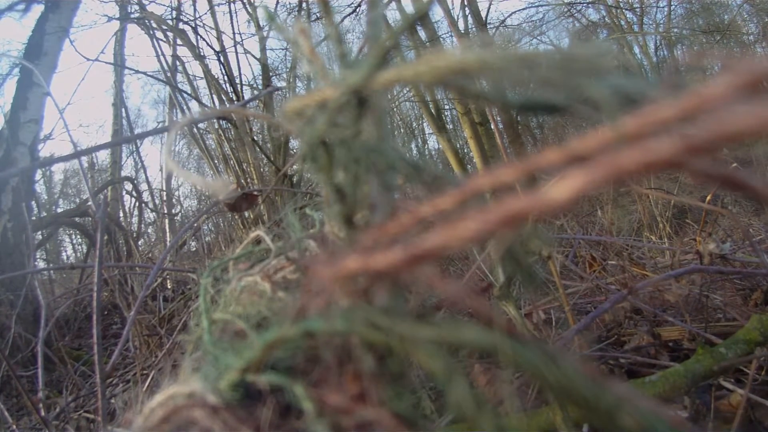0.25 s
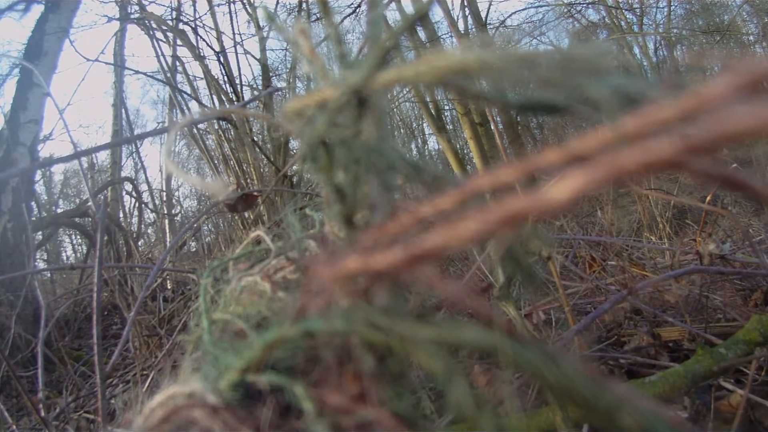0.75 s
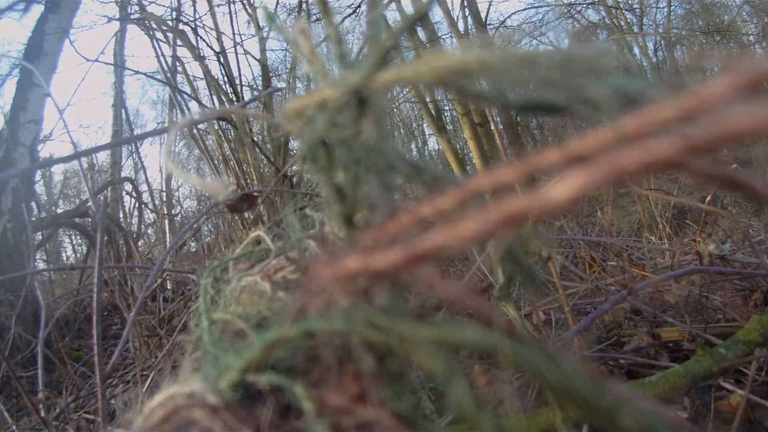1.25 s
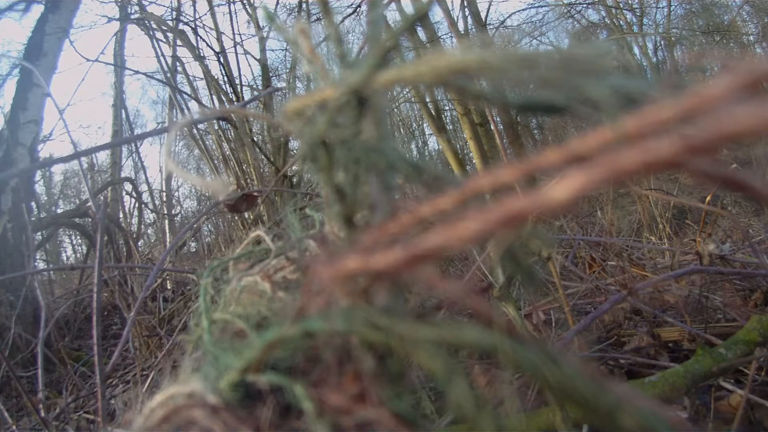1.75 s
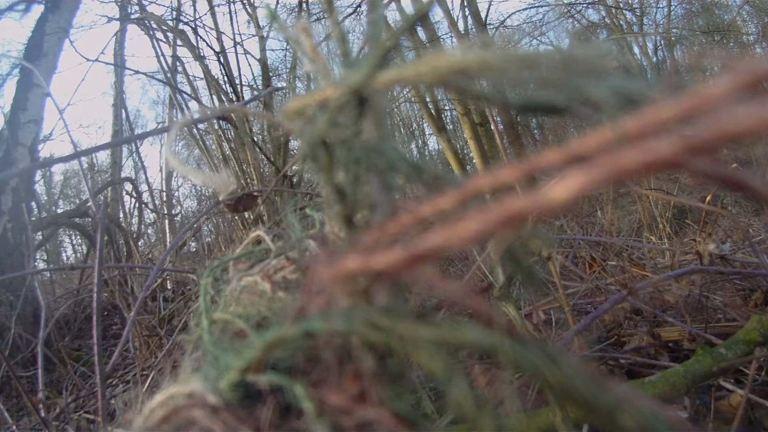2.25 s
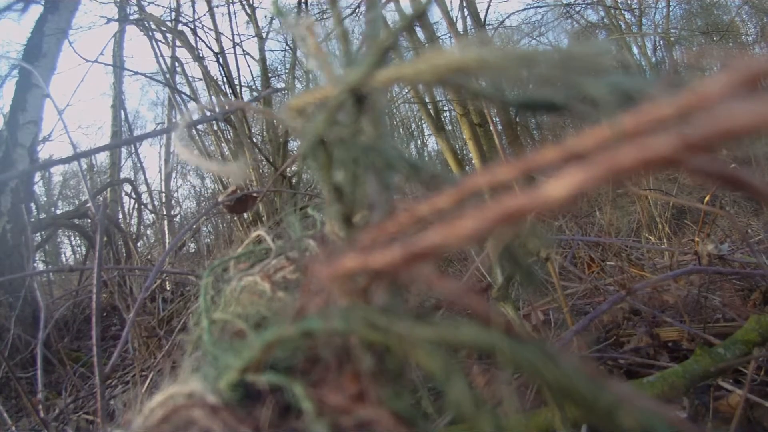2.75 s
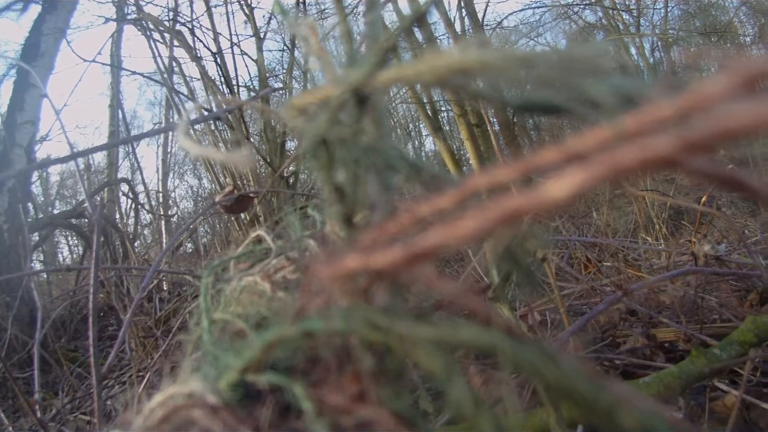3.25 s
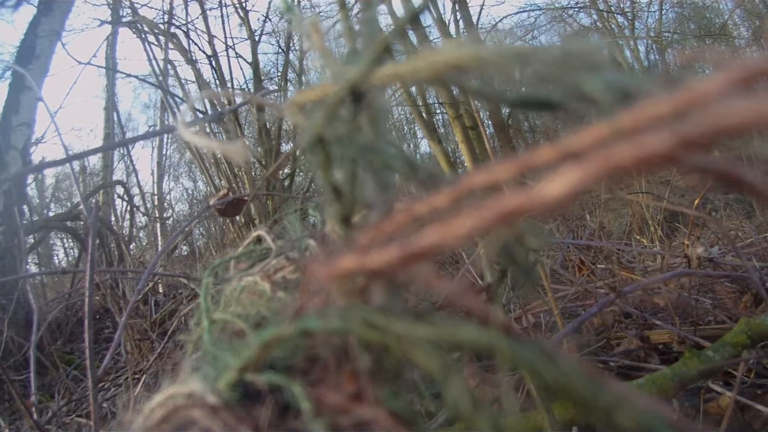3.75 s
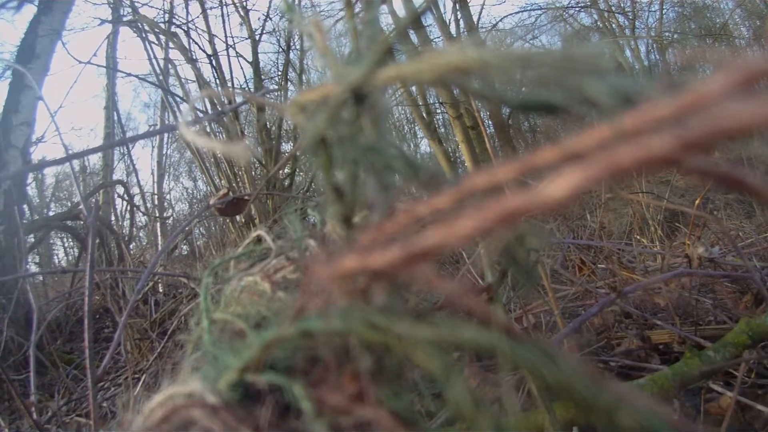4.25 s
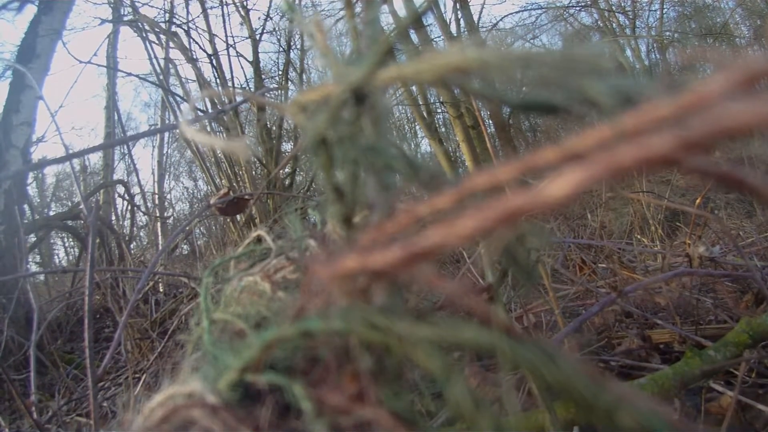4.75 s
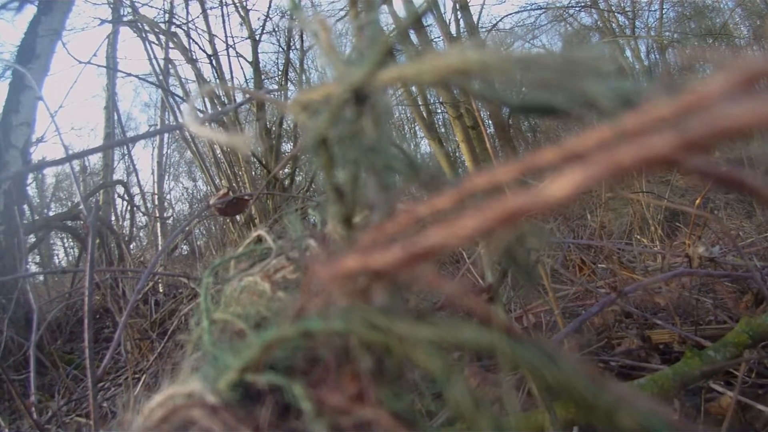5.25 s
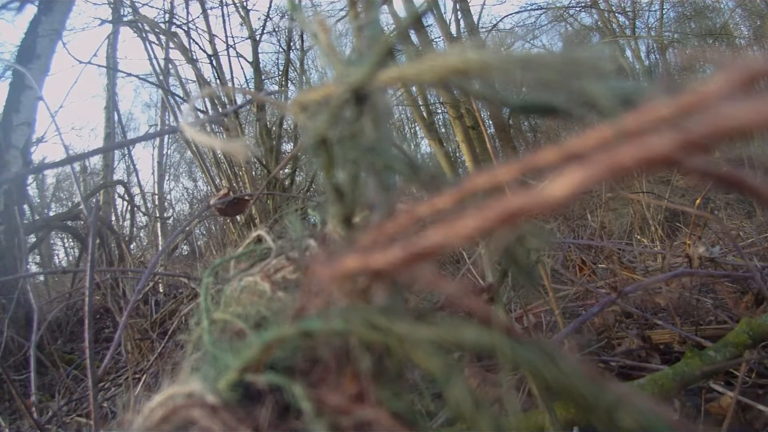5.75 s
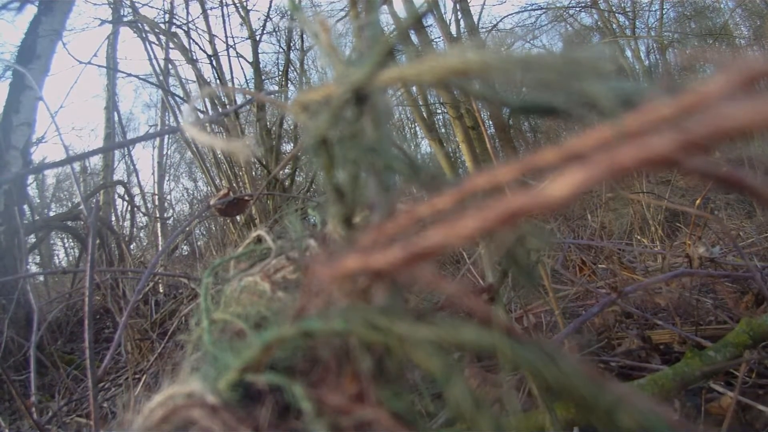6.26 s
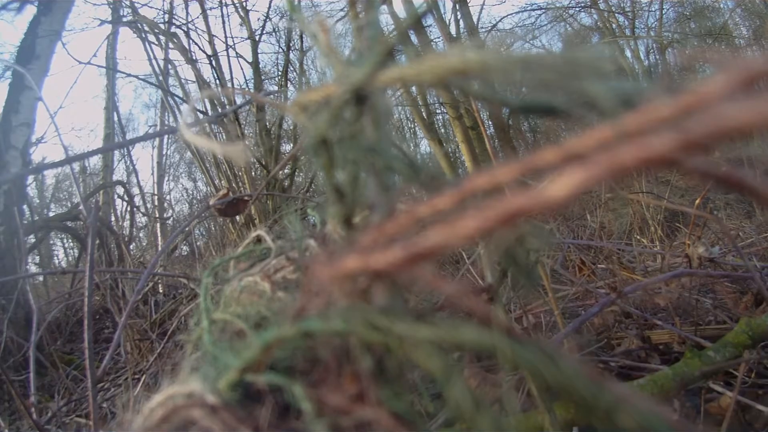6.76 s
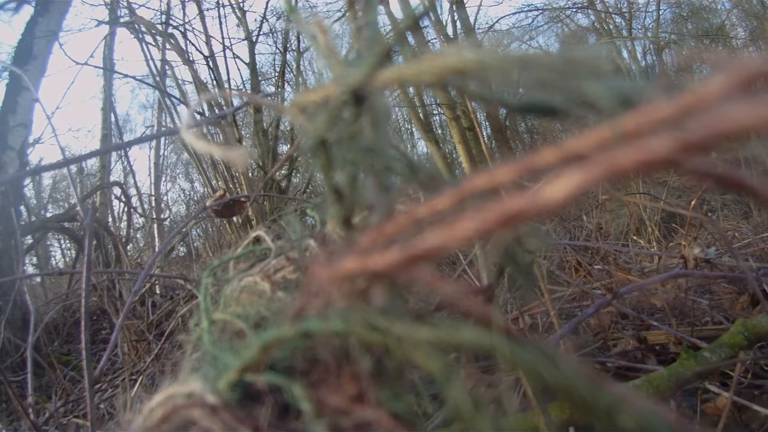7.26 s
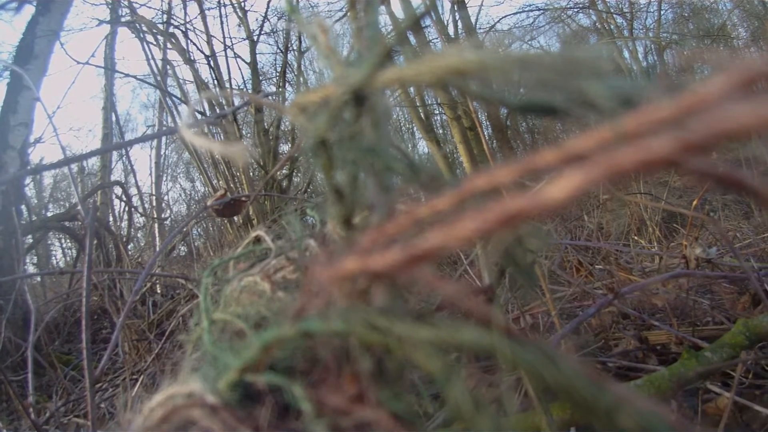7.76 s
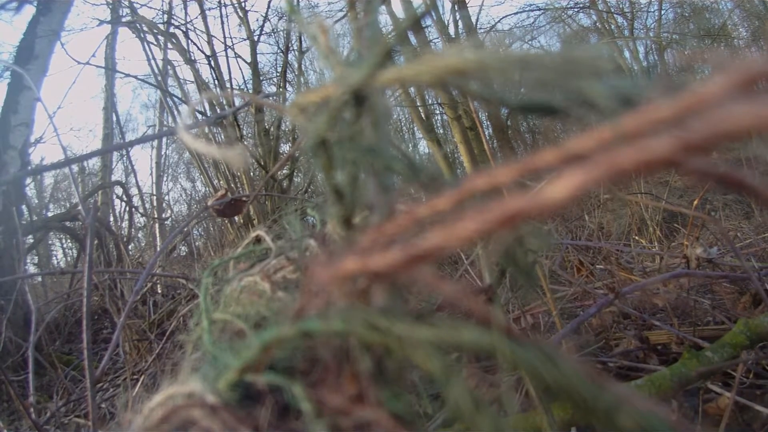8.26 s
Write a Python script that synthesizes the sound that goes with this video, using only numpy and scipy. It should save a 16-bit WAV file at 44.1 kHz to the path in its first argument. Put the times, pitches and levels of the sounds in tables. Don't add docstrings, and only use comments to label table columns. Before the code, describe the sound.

Four harsh, overloaded mechanical snaps from an airsoft gun very near, spaced seconds apart, over quiet forest, far popping shots and dry brush crackle.

```python
import sys
import numpy as np
from scipy import signal
from scipy.fft import rfft, irfft, next_fast_len
from scipy.io import wavfile
from scipy.ndimage import uniform_filter1d, map_coordinates

SR = 44100
rng = np.random.default_rng(int(sys.argv[2]) if len(sys.argv) > 2 else 0)


def output_pcm(signal):
    pcm = np.clip(np.atleast_2d(signal).T, -1, 1) * 32767
    wavfile.write(sys.argv[1], SR, np.round(pcm).astype(np.int16))


def volts_from_decibels(level):
    exponent = np.asarray(level, float) / 20
    return 10 ** exponent


N = 375732
T = np.arange(N) / SR

# start_s, peak_db, gear_db, ringing_s
SLAMS = [
    (2.772, 1, -16.5, 0.012),
    (3.857, -0.5, -16.5, 0.012),
    (5.068, 0.5, -16.5, 0.0125),
    (7.341, 0.5, -16, 0.013),
]
# release_s, top_mesh_hz, level_db, windup_time_share
WINDS = [
    (2.75, 1592, -20, .72),
    (3.843, 1564, -24.5, 1.01),
    (5.063, 1551, -18.5, 1.01),
    (7.333, 1546, -17.5, 1.01),
]
# time_s from the release, speed_share, level_db
SPINUP = [(-.062, .56, -30), (-.054, .6, -9), (-.042, .76, -15), (-.033, .87, -1), (-.022, .94, 0),
          (-.01, .99, 0), (-.001, 1.01, -2), (.003, 1.01, -40)]
# pitch_hz, level_db
GEAR_COLOUR = [(88, -47), (150, -12), (649, -7), (923, -4), (1560, -6), (1980, -5.5), (2760, -4),
               (3840, -2.5), (4950, -7), (5680, -4), (7770, -7), (14800, -23.5), (16000, -38)]
# pitch_hz, level_db
LOADED = [(150, -4), (600, -3), (1000, -.5), (7000, 0.1), (10500, -1.5), (12500, -4), (15000, -1.5)]
# pitch_hz, level_db
LOOSE = [(2000, -1.2), (7000, 0.2), (10500, 0.75), (12500, 1.5), (15000, 4)]
# pitch_hz, width_hz, level_db
SHELL = [(350, 240, -21), (920, 60, -9), (1330, 360, -16), (1970, 220, -7), (3300, 250, -9.5),
         (3870, 160, -8.5), (4460, 180, -4.5), (5757, 260, -1.5), (6770, 170, -8), (7140, 150, -10)]
START_S, SPIN_S = 0.09, 0.02
ENGAGE_S, IDLE_DB = .058, -7
COAST_S, RUNDOWN_S = 0.049, 0.028
CREEP_DB, HALT_S, HALT_T60 = -22.5, 0.13, 0.17
SLACK_DB, SLACK_S = -3, .031
PINION_TEETH = 5
LUMP_DB, JUDDER_DB = 1.64, 1.6
HEAD_HZ, HEAD_RISE_HZ, HEAD_S, HEAD_DB = 5680, 220, .0078, 5

# start_s, crack_db
TAKE_UP = [
    (3.7459, -27.5),
    (3.755, -22),
    (4.9636, -20.5),
    (4.9703, -19),
]
# start_s, crack_db
TRIGGER = [
    (2.6893, -5.5),
    (3.7773, -4.5),
    (4.9918, -5.5),
    (7.2605, -8.5),
]
# start_s, crack_db
REBOUND = [(2.8045, -1), (2.8184, -5.5), (3.8755, -1.5), (3.889, -2), (5.0851, -1.7), (5.1013, -1.7),
           (7.3745, 2.5), (2.7895, -2)]
# start_s, crack_db
STOP = [
    (2.8984, 9),
    (3.9635, -3),
    (5.1892, 7),
    (7.4538, 2.5),
]
# start_s, crack_db
BOUNCE = [(2.9251, -19), (2.912, -19), (2.918, -22), (2.9295, -20), (2.9015, -3), (5.2025, -19),
          (3.9765, -23), (3.9718, -18), (5.1963, -12), (7.4634, -15), (2.9055, -7)]
# start_s, crack_db
RELEASE = [
    (2.7665, -2),
    (3.8545, 0.5),
    (5.0662, -0.5),
    (7.3375, -3.5),
]
# start_s, crack_db
FAINT_CRACKS = [(2.8962, -17), (3.9592, -19.5), (5.1865, -16.5), (7.4505, -22), (5.183, -22), (5.2125, -25.5),
                (2.879, -30), (2.89, -27)]
# contacts, knock_db, stock_db, jolt_db over the crack, decay_s
CONTACTS = [
    (TAKE_UP, -49, -54.5, -45.5, 0.02),
    (TRIGGER, -18, -30, -50.5, 0.017),
    (REBOUND, -20, -35.5, -45, 0.014),
    (RELEASE, -30, -45, -49, 0.011),
    (FAINT_CRACKS, -40.5, -50, -50.5, .015),
    (STOP, -19, -29.5, -46.5, 0.022),
    (BOUNCE, -30, -29, -55, 0.021),
]
STOCK_FOLLOWS = .7
# pitch_hz, level_db
CRACK = [(710, -46), (1200, -20.5), (1980, -7.5), (2900, -0.5), (4500, 0.5), (4960, -1.5), (6160, 1.5),
         (6950, -8), (9610, -9), (10600, -29.5), (16000, -32)]
# pitch_hz, level_db, decay_s
LATCH = [(1940, -10, .016), (2990, -2.5, 0.02), (3950, -4.5, 0.013), (4510, -5, .014), (5450, 0.5, 0.019),
         (6030, -2.5, 0.012), (8030, -11, .012), (9540, -8, 0.01)]
# start_s, peak_db, pitch_hz
THUMPS = [
    (2.78, -6, 1026),
    (3.8642, -4, 960),
    (5.0756, -5.5, 958),
    (7.3476, -4.5, 950),
]
# start_s, pitch_hz, level_db, decay_s
SEATS = [(2.904, 250, -27, .2), (7.457, 250, -33, .2), (3.78, 245, -30, .12), (4.994, 1050, -20, .02),
         (5.079, 930, -14, .04), (2.9, 60, -36, .1), (2.72, 4500, -16, .12), (7.32, 4550, -14, .06),
         (2.803, 3900, -8, .02), (2.817, 5700, -9, .04), (2.834, 900, -21, 0.043),
         (2.788, 6250, -5.5, 0.038), (3.873, 6300, -7, .03), (3.8665, 3000, -5, .015),
         (2.782, 3800, -6.5, .02), (3.888, 3800, -7, 0.022), (3.914, 860, -16, .035),
         (3.893, 240, -22, 0.056), (5.1, 3850, -10, .02), (5.126, 830, -15, .035),
         (7.3735, 3850, -2.5, 0.022), (7.411, 900, -19, 0.023), (7.354, 6600, -7.5, .04),
         (2.7145, 5600, -17, .03), (3.8, 5700, -12.5, .03), (5.015, 6200, -12, .03), (7.28, 2050, -14, .04),
         (7.283, 4800, -19, .03)]
# start_s, pitch_hz, level_db, decay_s
SPRING = [
    (2.9, 754, -58, 1.6),
    (3.97, 754, -56, 2.),
    (3.97, 1147, -60, 1.),
    (5.19, 758, -56, 2.),
    (5.19, 1147, -63, 1.),
]
# start_s, pitch_hz, level_db, decay_s
JINGLES = [(3.2, 1850, -48, .12), (4.05, 2681, -57, .4), (4.1, 2740, -50, 0.22), (4.15, 2787, -47, 0.23),
           (4.19, 2600, -52, .15), (4.12, 2300, -52, .3), (4.14, 4350, -53, .3), (4.14, 3750, -54, .3),
           (4.15, 1825, -55, 0.33), (4.23, 5250, -56, .3), (4.35, 1086, -50, 0.26),
           (4.355, 2356, -50.5, 0.18), (4.445, 5230, -52, 0.22), (5.215, 4440, -31, 0.08),
           (6.18, 7460, -59.5, 0.27)]
# pitch_hz, level_db
MOUNT = [(30, -4.5), (100, -6.5), (300, -13), (700, -19), (1000, -24), (1500, -31), (2200, -50),
         (5000, -62)]

# start_s, peak_db
FAR = [(1.1942, -17.5), (1.299, -18.5), (1.4007, -15.5), (1.508, -16), (1.6162, -18), (1.7255, -17),
       (1.8384, -19), (2.4652, -22), (2.574, -19.5), (2.6524, -25)]
# pitch_hz, level_db
POP = [(1500, -24.5), (2700, -18.5), (3500, -1), (4300, -0.5), (4900, -0.5), (5400, -7), (6100, -5.5),
       (7200, -10.5), (9500, -24), (14000, -38)]
# pitch_hz, level_db, decay_s
RECEIVER = [(3624, 1, 0.014), (4940, 3, 0.013), (6150, -1.5, 0.011), (4250, -7, 0.011), (7430, -9, .01)]
# pitch_hz, level_db
WASH = [(1500, -30.5), (2800, -17), (3500, -7), (3850, -7.5), (4350, -0.5), (5150, -8), (5900, -0.5),
        (6600, -9.5), (7300, -8.5), (9500, -24.5), (14000, -42)]
# pitch_hz, decay_s
WOOD = [(500, 0.99), (3000, 0.66), (6000, 0.54), (12000, 0.13)]
FAR_BOOM_DB, FAR_ECHO_DB = -25, -10
FAR_WHINE_HZ, FAR_WHINE_DB = 1502, -58

# start_s, peak_db, pitch_hz
PELLETS = [(1.9678, -28.5, 4970), (2.976, -21, 4800), (5.6407, -17, 5680), (5.6675, -36, 6700),
           (5.6417, -27, 4100), (5.646, -33, 5400), (7.918, -14.5, 5750), (1.9488, -34, 5000),
           (8.2753, -36, 5140)]
# start_s, peak_db, pitch_hz
TWIGS = [(0.0881, -31, 4300), (0.3321, -32.5, 4580), (0.4706, -35, 5300), (3.4753, -32.5, 4500),
         (4.3678, -35.5, 4510), (4.3555, -37, 3000), (7.103, -36.5, 5560), (7.7979, -40, 5860)]
# start_s, peak_db, pitch_hz
BRANCHES = [(0.0094, -37, 4400), (3.1188, -38.5, 5600), (3.1558, -43, 2550), (3.1764, -39.5, 6440),
            (3.2247, -31.5, 4300), (3.2492, -26.5, 4900), (3.7219, -41, 6060), (4.348, -38, 5000),
            (4.3495, -30.5, 3800), (4.377, -35, 5000), (4.3785, -36, 4300), (4.3905, -38, 4200)]
# start_s, peak_db, pitch_hz
STICKS = [(4.2196, -36.5, 3900), (6.2725, -40.5, 5570), (4.416, -40.5, 4200), (5.7594, -40, 4890),
          (5.7676, -37.5, 3420), (5.8694, -48, 6070), (7.9815, -34.5, 3000), (8.1249, -47, 6190)]
# start_s, peak_db, pitch_hz
FAR_TICKS = [(6.4132, -42, 5470), (6.4418, -40.5, 6190), (6.6037, -44, 6150), (6.7636, -42.5, 5230),
             (6.9794, -40.5, 5150), (7.1985, -43, 5680), (8.3814, -38.5, 5950)]
# start_s, peak_db, pitch_hz
CRACKLES = [(3.2575, -27.5, 4700), (3.2695, -27.5, 4630), (3.2755, -29.5, 5200), (3.297, -31, 4900),
            (3.3245, -34, 3800), (3.3415, -29.5, 2500), (3.385, -34, 2100), (3.369, -33, 4800)]
# clicks, thud_db, echo_db
CLICKS = [
    (PELLETS, -45, -11.5),
    (TWIGS, -13, -19),
    (BRANCHES, -13.5, -10),
    (STICKS, -4, -10),
    (FAR_TICKS, -25, -1.3),
    (CRACKLES, -26, -17.5),
]
SNAP_DB, NOTE_T60 = -1.5, 0.012
# start_s, peak_db, rise_s, decay_s
RUSTLE = [(3.172, -43.5, .006, 0.24), (3.221, -40, .003, 1.25), (3.24, -42, 0.024, 0.83),
          (4.04, -46.5, 0.01, 0.34), (4.11, -48.5, 0.03, 0.3), (4.214, -68, .006, 0.27)]
# pitch_hz, level_db
BRUSH = [(410, -47.5), (700, -26), (1300, -20), (1800, -5.5), (3090, -6.5), (4750, -2), (6860, -8),
         (7800, -20), (9500, -31), (12000, -35.5), (15600, -61), (22000, -120)]
# time_s, pitch_hz, level_db
CHIRP = [
    (8.228, 5420, -57.5),
    (8.24, 5360, -55),
    (8.262, 5200, -54),
    (8.28, 5170, -57),
    (8.292, 5300, -55.5),
]

# start_s, peak_db
PUFFS = [(4.829, -42), (5.339, -42), (5.448, -52), (5.749, -55), (5.949, -52), (6.012, -39), (6.099, -47),
         (6.174, -47), (6.229, -46), (6.274, -49), (6.354, -40), (6.404, -38), (6.434, -38.5), (6.579, -42),
         (6.649, -39), (6.679, -51), (6.744, -48.5), (6.914, -43.5), (7.049, -48), (7.18, -49),
         (7.649, -53), (7.789, -48), (7.849, -47.5), (7.984, -39), (8.269, -48), (8.349, -52)]
PUFF_LEFT_DB = 3.5
# time_s, level_db
WIND = [(0, -68.5), (2.5, -66.5), (3.2, -65.5), (4, -66), (4.48, -60), (4.8, -63.5), (5.2, -59),
        (5.8, -62.5), (6.15, -56), (7.2, -60.5), (7.8, -62), (8.52, -68)]
# pitch_hz, level_db
BREEZE = [(15, -11), (50, -6), (120, -10.5), (250, -26), (500, -47)]
# time_s, peak_db, half_length_s
GUSTS = [(0.01, -57, 0.074), (0.214, -51, 0.032), (1.37, -51, 0.15), (1.95, -49, 0.19), (2.13, -47, 0.067),
         (2.67, -48.5, 0.24), (3.37, -57, 0.067), (4.966, -46.5, 0.096), (5.976, -49.5, 0.16),
         (6.603, -50, 0.14), (7.281, -50.5, 0.17), (8.101, -58.5, .2)]
# pitch_hz, level_db
LEAVES = [(2500, -38), (4000, -11), (5800, -0.5), (7000, -6.5), (10000, -27)]
CALM_DB, AFTER_DB, AFTER_S, AFTER_T60 = -61, -45.5, .08, 1.8
# pitch_hz, level_db
FLOOR = [(18, -49.5), (30, -10), (86, -7.5), (124, -8.5), (157, -5.5), (194, -7.5), (473, -11.5),
         (600, -13.5), (721, -9.5), (4420, -13), (4780, -13), (6380, -17), (14400, -20.5), (15500, -21),
         (16000, -28.5)]
FLOOR_DB = -54.5
# pitch_hz, likeness
ALIKE = [(60, 0.49), (180, 0.9), (550, .92), (1400, 0.99), (5000, 0.85), (7500, 0.46), (10000, 0.59),
         (15000, .4)]

LEAD = .01
TOP_HZ = 15750


def unit(x):
    return x / np.sqrt(np.mean(x ** 2) + 1e-20)


def peaked(x, db):
    return x * volts_from_decibels(db) / np.abs(x).max()


def along(points, hz):
    f, v = np.transpose(points)
    return np.interp(np.log(hz + 1), np.log(f + 1), v)


def curves(rows, start=0):
    s, *cols = np.transpose(rows)
    return [np.interp(T - start, s, c) for c in cols]


def wobble(rate):
    return map_coordinates(rng.standard_normal(int(N * rate / SR) + 4), [T * rate])


def filtered(x, response):
    m = next_fast_len(N + 8192)
    return irfft(rfft(x, m) * response(np.fft.rfftfreq(m, 1 / SR)), m)[..., :N]


def coloured(x, spectrum):
    return filtered(x, lambda hz: unit(volts_from_decibels(along(spectrum, hz))))


def voiced(x, spectrum):
    gain = volts_from_decibels(along(spectrum, np.fft.rfftfreq(len(x), 1 / SR)))
    return irfft(rfft(np.roll(x, round(LEAD * SR))) * gain, len(x))


def modes(f, table):
    return sum((-1) ** k * volts_from_decibels(db) * 1j * f * w / (c * c - f * f + 1j * f * w)
               for k, (c, w, db) in enumerate(table))


def add(track, s, sound):
    part = track[round(s * SR):][:len(sound)]
    part += sound[:len(part)]


def burst(db, t60, rise=0.00064):
    t = T[:SR // 4]
    return volts_from_decibels(db - 60 * t / max(t60, .003)) * (1 - np.exp(-t / rise)) * rng.standard_normal(len(t))


def ring(hz, db, t60, rise=0.00082, size=SR // 4):
    t = T[:size]
    return volts_from_decibels(db - 60 * t / t60) * (1 - np.exp(-t / rise)) * np.sin(2 * np.pi * hz * t)


def swell(s, db, rise, t60):
    u = T - s
    return np.clip(u / rise, 0, 1) ** 2 * volts_from_decibels(db - 60 * np.clip(u - rise, 0, None) / t60)


def echoes(x, delay=0.0061):
    hz, t, z = signal.stft(rng.standard_normal(SR), SR, nperseg=256)
    fading = z * volts_from_decibels(-60 * t / along(WOOD, hz)[:, None])
    tail = signal.istft(fading, SR, nperseg=256)[1]
    late = np.pad(x, (round(delay * SR), 0))
    return signal.fftconvolve(late, tail / np.linalg.norm(tail))[:N]


def gear_cycle(s):
    u = np.clip(T - s, -1, 1)
    up = (1 - np.exp(-np.clip(u + START_S, 0, None) / SPIN_S)) ** 1.8
    down = volts_from_decibels(-10 * (np.clip(u - COAST_S, 0, None) / RUNDOWN_S) ** 1.8)
    load = volts_from_decibels(np.interp(u, [-ENGAGE_S - .007, -ENGAGE_S], [IDLE_DB, 0]))
    creep = volts_from_decibels(CREEP_DB - 60 * np.clip(u - HALT_S, 0, None) / HALT_T60)
    return up * load * np.maximum(down, creep)


def slam_noise(u, db, ringing):
    times = [-.0005, 0, HEAD_S, ringing - .001, ringing + .001, ringing + .012, ringing + 0.06]
    hold = volts_from_decibels(np.interp(u, times, [-40.0, -1.5, 0.9, 2.5, -11, -15.5, -45.5], -200, -200))
    return volts_from_decibels(db - 1.5) * hold * rng.standard_normal(N)


def head_song(u, db, ringing):
    times = [-.0004, .0006, HEAD_S, ringing, ringing + .02]
    sing = volts_from_decibels(np.interp(u, times, [-40., 0, -1.0, -15, -40.5], -200, -200))
    pitch = HEAD_HZ + HEAD_RISE_HZ * np.clip(u / HEAD_S, 0, 1.2) + 130 * wobble(900)
    return volts_from_decibels(db + HEAD_DB + 2.5 * wobble(600)) * sing * np.sin(2 * np.pi * np.cumsum(pitch) / SR)


def gearbox():
    loaded, loose, whine, song, blast = np.zeros((5, N))
    teeth = volts_from_decibels(1.2 * wobble(1600) + .8 * wobble(170))
    for (s, db, gear_db, ringing), (free, mesh_hz, whine_db, share) in zip(SLAMS, WINDS):
        u = T - s
        speed, load_db = curves(np.array(SPINUP) * [share, 1, 1], free)
        turn = 2 * np.pi * np.cumsum(mesh_hz * speed * (1 + .012 * wobble(300))) / SR
        mesh = np.sin(turn) + .2 * np.sin(2 * turn) + .5 * np.sin(3 * turn) + .4 * np.sin(4 * turn)
        whine += (np.abs(T - free) < .07) * volts_from_decibels(whine_db + load_db + 2 * wobble(250)) * mesh
        shaft = turn / PINION_TEETH
        lump = volts_from_decibels(LUMP_DB * (np.cos(shaft) + .5 * np.cos(3 * shaft)))
        grind = volts_from_decibels(gear_db) * gear_cycle(s) * teeth * rng.standard_normal(N)
        loaded += (u < 0) * unit(lump) * grind
        loose += (u >= 0) * volts_from_decibels(-0.66 + SLACK_DB * (u < SLACK_S) + JUDDER_DB * wobble(110)) * grind
        blast += slam_noise(u, db, ringing)
        song += head_song(u, db, ringing)
    blast = filtered(blast, lambda hz: hz ** 4 / (hz ** 4 + 1400.0 ** 4))
    grind = filtered(loaded, lambda hz: volts_from_decibels(along(LOADED, hz)))
    grind += filtered(loose, lambda hz: volts_from_decibels(along(LOOSE, hz)))
    in_shell = filtered(coloured(grind, GEAR_COLOUR), lambda f: unit(.14 + np.abs(modes(f, SHELL))))
    return in_shell + coloured(blast, GEAR_COLOUR) + song + whine


def struck_steel():
    return sum(ring(hz * rng.normal(1, 0.015), level + rng.normal(0, 1.6), 0.81 * life, rise=0.00056)
               for hz, level, life in LATCH)


def action():
    crack, knock, tone = np.zeros((3, N))
    for hits, mid_db, kind_stock_db, jolt_db, t60 in CONTACTS:
        for s, db in hits:
            stock_db = kind_stock_db + STOCK_FOLLOWS * db
            add(crack, s - .0005 - LEAD, peaked(voiced(burst(0, t60), CRACK), db - 2.5))
            add(crack, s - .0005, peaked(struck_steel(), db - 7.0))
            add(knock, s, burst(mid_db + 14.0, 2.58 * t60, rise=0.0022))
            add(tone, s, ring(250, stock_db + 3.0, 0.066, rise=0.002))
            add(tone, s, ring(248, stock_db - 15, .2))
            add(tone, s, ring(345, stock_db - 1.0, 0.063, rise=0.0025))
            add(tone, s, ring(75, db + jolt_db, .1, rise=.003))
    for s, db, hz in THUMPS:
        add(tone, s + .0006, ring(1.1 * hz, db + 20, .0065, rise=.0005))
        add(tone, s + .0006, ring(930, db - 9, .045, rise=.002))
        add(tone, s - .0155, ring(120, db - 19.0, 0.11, rise=0.0033))
        add(tone, s - .0155, ring(285, db - 11.5, 0.063, rise=0.0025))
        add(tone, s - .0155, ring(85, db - 27, 0.2))
        add(tone, s - .003, ring(350, db - 11.0, 0.029, rise=0.002))
    for s, hz, db, t60 in SEATS:
        add(tone, s, ring(hz, db + 2, t60, rise=0.0015))
    for s, hz, db, t60 in SPRING + JINGLES:
        add(tone, s, ring(hz, db, t60, rise=.004, size=SR))
    return crack + filtered(knock, lambda f: modes(f, [(1065, 890, 0.0068)])) + tone


def near_rifle():
    rifle = gearbox() + action()
    shake = filtered(rifle, lambda hz: volts_from_decibels(along(MOUNT, hz)) * np.exp(1.2j))
    thin = filtered(rifle, lambda hz: hz ** 2 / (hz ** 2 + 1300 ** 2))
    return rifle + np.array([shake, -shake]) + volts_from_decibels(-33.5) * echoes(thin)


def far_rifles():
    pop, low, wet = np.zeros((3, N))
    t = T[:1500]
    whine = np.hanning(1500) * np.sin(2 * np.pi * FAR_WHINE_HZ * (t + 1.5 * t ** 2))
    for s, db in FAR:
        body = sum(ring(hz * rng.normal(1, .015), level + rng.normal(0, 2), t60, rise=.0014)
                   for hz, level, t60 in RECEIVER)
        add(pop, s - .0005, peaked(body, db - 5.0))
        add(pop, s - .0035, peaked(body, db - 19.0))
        add(pop, s + 0.0095, peaked(body, db - 16.0))
        add(pop, s - .001 - LEAD, peaked(voiced(burst(0, 0.009, rise=0.0025), POP), db - 7))
        add(pop, s - .045, volts_from_decibels(FAR_WHINE_DB) * whine)
        add(low, s, burst(FAR_BOOM_DB, 0.032))
        wet[round(s * SR)] = volts_from_decibels(FAR_ECHO_DB)
    boom = filtered(low, lambda f: modes(f, [(1500, 1800, 0.0013)]) ** 2)
    wet = coloured(wet, WASH) + 0.48 * boom
    turn = np.floor(T / .107) % 7
    return pop + boom + sum(echoes(wet * (turn == k), delay=0.0036) for k in range(7))


def snaps():
    dry, wet = np.zeros((2, N))
    thud = signal.butter(2, [450, 2200], "band", fs=SR, output="sos")
    for hits, low_db, tail_db in CLICKS:
        for s, db, hz in hits:
            edges = np.clip([hz / 1.52, hz * 1.28], 200, 15000)
            sos = signal.butter(2, edges, "band", fs=SR, output="sos")
            click = signal.sosfilt(sos, burst(0, .009, rise=.0003))
            add(dry, s - .0005, ring(hz, db - 5, NOTE_T60, rise=.0003))
            add(dry, s - .0003, peaked(ring(1.15 * hz, 0, .0016, rise=.00005), db + SNAP_DB))
            add(dry, s - .0005, peaked(click, db - 1))
            add(dry, s - .0005, peaked(signal.sosfilt(thud, burst(0, 0.042)), db + low_db + 2.5))
            wet[round(s * SR)] = volts_from_decibels(db + tail_db + 16.5)
    late = T > 6
    tail = echoes(wet * late, delay=0.0027) + echoes(wet * ~late, delay=0.0055)
    return dry + coloured(tail, [(1000, -24.5), (3500, -13.5), (6000, -0.5), (9000, -11.5), (15000, -32.5)])


def brush():
    level = sum(swell(*push) for push in RUSTLE)
    grains = volts_from_decibels(1.2 * wobble(530) + .6 * wobble(40)) * rng.standard_normal(N)
    return level * unit(coloured(grains, BRUSH))


def bird():
    hz, db = curves(CHIRP)
    on = uniform_filter1d(1. * (T > CHIRP[0][0]) * (T < CHIRP[-1][0]), size=400)
    return on * volts_from_decibels(db + 7.0 + 2.4 * wobble(150)) * np.sin(2 * np.pi * np.cumsum(hz) / SR)


def puffs():
    out = np.zeros((2, N))
    t = T[:SR // 5]
    band = signal.butter(1, [35, 160], "band", fs=SR, output="sos")
    for s, db in PUFFS:
        push = np.cumsum(rng.standard_normal((2, len(t))), axis=1)
        lump = signal.sosfilt(band, push * (t / .012) * np.exp(-t / 0.0117))
        add(out[0], s - .01, peaked(lump[0], db - 0.5 + PUFF_LEFT_DB / 2))
        add(out[1], s - .01, peaked(1.5 * lump[0] + lump[1], db - 3.0 - PUFF_LEFT_DB / 2))
    return out


def breeze():
    level_db, = curves(WIND)
    lumps = unit(volts_from_decibels(2.5 * wobble(7.6)) * coloured(rng.standard_normal((2, N)), BREEZE))
    return volts_from_decibels(level_db + np.array([[1.5], [-3.]])) * lumps


def leaf_hiss():
    gusts = sum(volts_from_decibels(db - 5.3 * ((T - s) / half) ** 2) ** 2 for s, db, half in GUSTS)
    afters = sum(swell(s, AFTER_DB, AFTER_S, AFTER_T60) ** 2 for s, *_ in SLAMS)
    hiss_level = np.sqrt(volts_from_decibels(CALM_DB) ** 2 + gusts + afters)
    return hiss_level * volts_from_decibels(-5.5 + 1.9 * wobble(23)) * unit(coloured(rng.standard_normal(N), LEAVES))


def floor():
    turn = lambda hz: np.arccos(np.clip(along(ALIKE, hz), -1, 1)) / 2
    pair = unit(coloured(rng.standard_normal((2, N)), FLOOR))
    mid, side = filtered(pair, lambda hz: np.array([np.cos(turn(hz)), np.sin(turn(hz))]))
    hiss = volts_from_decibels(FLOOR_DB + 0.72 * wobble(1.5)) * np.array([mid + side, mid - side])
    return hiss + volts_from_decibels(-76.0 + 2 * wobble(20)) * np.sin(2 * np.pi * 7950 * T)


def scene():
    wood = far_rifles() + snaps() + brush() + bird()
    return near_rifle() + wood + puffs() + breeze() + leaf_hiss() + floor()


def band_limit(x):
    return signal.sosfilt(signal.butter(12, 20000, fs=SR, output="sos"), x)


def record(dry):
    flattened = np.clip(dry, -1.05, 1.05)
    mix = filtered(flattened, lambda hz: np.clip((TOP_HZ - hz) / 300, 0, 1))
    return band_limit(mix)


dry = scene()
out = record(dry)
output_pcm(out)
```